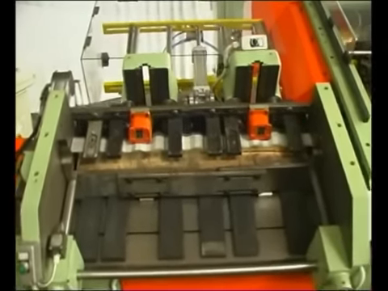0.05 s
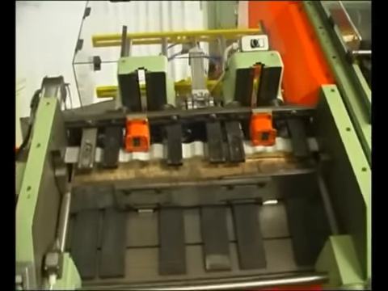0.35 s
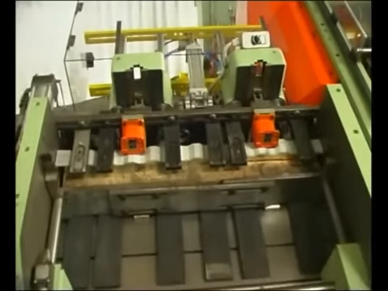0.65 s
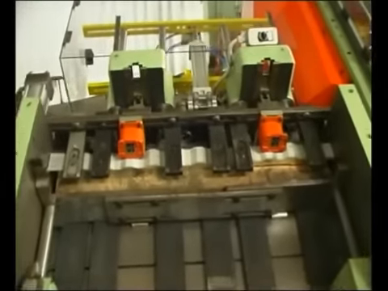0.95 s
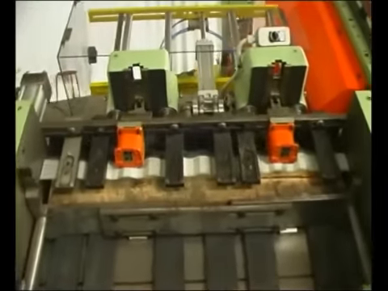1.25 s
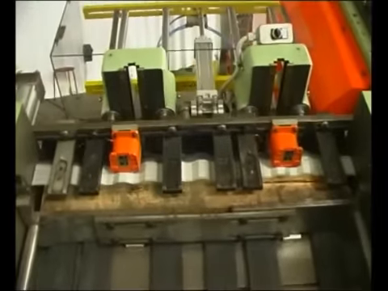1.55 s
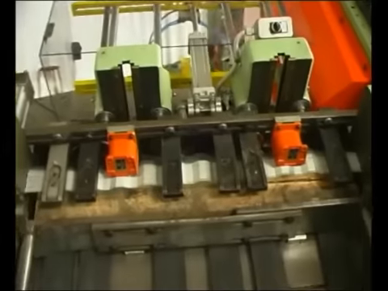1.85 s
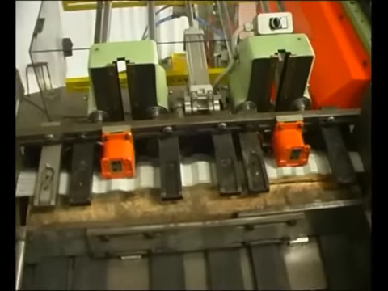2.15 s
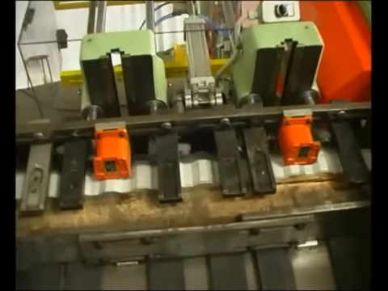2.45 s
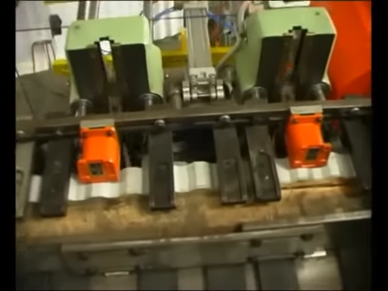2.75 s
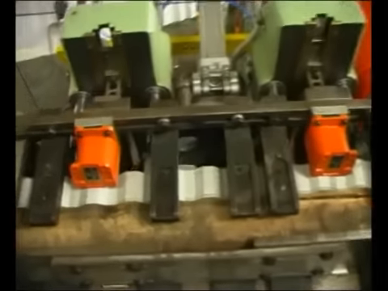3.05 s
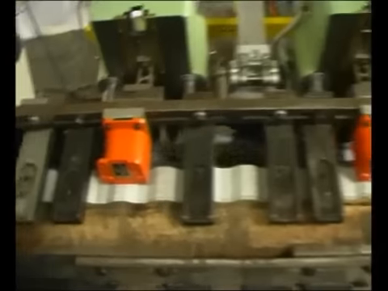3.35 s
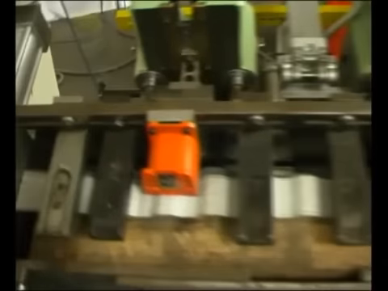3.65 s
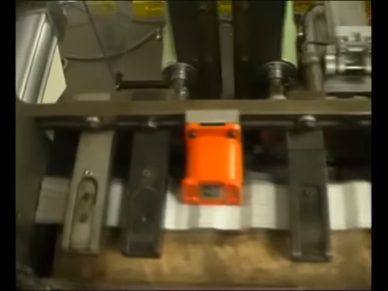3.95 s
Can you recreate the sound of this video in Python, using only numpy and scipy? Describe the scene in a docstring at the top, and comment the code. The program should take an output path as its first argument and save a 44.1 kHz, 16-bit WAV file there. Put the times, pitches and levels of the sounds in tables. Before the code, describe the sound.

A sheet-metal press pounds close by throughout, about five or six cracking, hollow knocks a second, over steady factory din with slight echo. High, whistling air hisses from the start until 1.4 seconds and again from 2.3 to 3.7. A sheet scrapes briefly near 1.1 and 3.4 seconds, each time followed by sharp metal clacks. Duller clacks and thuds come between 2.1 and 2.5 seconds.

```python
"""Sheet-metal press in a factory hall

Impacts excite the modes of a press about 5.6 times a second: each stroke cracks through the sheet
with a round knock and rings the bed. Twice, 13 strokes apart, turbulent air jets hiss to lift a new
sheet, which scrapes forward by friction and clacks against its stops. The metal is heard from
close by, with the hall's reverberation and a steady din of machinery behind it."""
import sys
import numpy as np
from scipy import signal
from scipy.fft import rfft, irfft
from scipy.io import wavfile
from scipy.ndimage import uniform_filter1d

SR = 44100
rng = np.random.default_rng(int(sys.argv[2]) if len(sys.argv) > 2 else 0)


def materialize(psi):
    """Save the field psi as 16-bit PCM at rate SR to the path in sys.argv[1].

    A 1-D psi becomes a single channel; in a 2-D psi each row is a channel.
    """
    bounded = np.clip(np.atleast_2d(psi).T, -1, 1)
    quanta = np.round(bounded * 32767).astype(np.int16)
    wavfile.write(sys.argv[1], SR, quanta)


N = 176400
FIRST_STROKE_S, STROKE_S = -.0602, .17758
ATTACK_S, TOP_HZ = .00055, 11600  # rise of a hard contact; upper edge of the sound

# Strength of the crack, stroke by stroke: level_db
STROKE_CRACK_DB = [5, -2, -1.5, -3.5, -3.5, -4.5, -3, -3, -2, 0, -1, -1, -2, -3, -1.5, -0.5, -4, -2, -1.5,
                   -1.5, -9, -6, -2]
# Strength of the knock and the bed's ring, stroke by stroke: level_db
STROKE_RING_DB = [-6, -6, -4, -3, -3, -3, -2, -2, -1, -.5, .3, 0, 0, -7, -7, 0, -.5, -.5, -.5, -1.5, -4.5,
                  -5.5, -8]
# Contacts that push on the bed within every stroke: delay_s, push_db
CONTACT_PUSHES = [(0, -10), (.0051, -7), (.0101, 0), (.0218, -9), (.0437, -13), (.063, -22), (.074, -22),
                  (.123, -24)]
# Noises of the same contacts: thump_db, crack_db, clatter_db
CONTACT_NOISES = [(0, 0, -6), (-37, -12, -6), (-17, -8, -4), (-14, -17, -5), (-3, -9, -2), (-6, -23, -4),
                  (-4, -25, -7), (-24, -22, -13)]
# Modes of the press bed: pitch_hz, level_db, t60_s
BED_MODES = [(149, -22, .15), (176, -24, .2), (290, -20, .12), (330, -22, .3), (410, -19, .15),
             (582, -20, .35), (680, -11, .08), (716, -15, .1), (805, -4, .06), (858, -13, .1),
             (1072, -20, .12)]
# Spectrum of the cracking sheet: frequency_hz, density_db
CRACK_SPECTRUM = [(300, 4), (1000, -5), (2000, 0), (3300, -5), (5000, 1), (7000, 1), (9000, -4.5),
                  (12000, -23)]
# Spectrum of dull metal clatter: frequency_hz, density_db
CLATTER_SPECTRUM = [(60, -28), (150, -4), (400, 2.5), (750, 6.5), (1100, 0), (1500, 0), (2500, -4.5),
                    (4000, -7.5), (9000, -59)]
BED_DB, BED_RISE_S = -14.3, .001
THUMP_DB, THUMP_HZ, THUMP_T60_S = -9, 328, .0088
CRACK_DB, CRACK_T60_S, CLATTER_DB, CLATTER_T60_S = -7.5, .054, -14.5, .069
def press():
    """Impact excitation: each contact rings the bed's damped modes, thumps, cracks and clatters."""
    t = np.arange(SR // 2) / SR
    ring = thump = crack_power = clatter_power = 0  # incoherent noises add in power
    for (delay, push_db), (thump_db, crack_db, clatter_db) in zip(CONTACT_PUSHES, CONTACT_NOISES):
        age = np.maximum(t - delay, 0)
        modes = sum(undb(db) * fade(age, t60, BED_RISE_S) * np.sin(2 * np.pi * hz * age)
                    for hz, db, t60 in BED_MODES)
        ring += undb(push_db) * modes
        thump += undb(thump_db) * fade(age, THUMP_T60_S, ATTACK_S) * np.sin(2 * np.pi * THUMP_HZ * age)
        crack_power += (undb(crack_db) * fade(age, CRACK_T60_S, ATTACK_S)) ** 2
        clatter_power += (undb(clatter_db) * fade(age, CLATTER_T60_S, ATTACK_S)) ** 2
    body = undb(BED_DB) * each_stroke(ring, undb(STROKE_RING_DB)) + undb(THUMP_DB) * each_stroke(thump)
    body = signal.sosfilt(signal.butter(4, 90, "high", fs=SR, output="sos"), body)
    crack = np.sqrt(each_stroke(crack_power, undb(STROKE_CRACK_DB) ** 2)) * noise(CRACK_SPECTRUM)
    clatter = np.sqrt(each_stroke(clatter_power)) * noise(CLATTER_SPECTRUM)
    return body + undb(CRACK_DB) * crack + undb(CLATTER_DB) * clatter


KNOCK_START_HZ, KNOCK_END_HZ, KNOCK_GLIDE_S = 460, 680, .014
KNOCK_DB, KNOCK_RISE_S, KNOCK_T60_S = -11.2, .0125, .05
HUM_HZ, HUM_DB, HUM_DELAY_S, HUM_HALF_WIDTH_S = 582, -28, .13, .053
def knocks():
    """Tension raises pitch: the punched sheet's knock glides up. The bed hums as the ram returns."""
    t = np.arange(int(STROKE_S * SR)) / SR
    hz = KNOCK_END_HZ + (KNOCK_START_HZ - KNOCK_END_HZ) * np.exp(-t / KNOCK_GLIDE_S)
    load = np.sqrt(np.minimum(t / KNOCK_RISE_S, 1))
    decay = undb(-60 * np.maximum(t - KNOCK_RISE_S, 0) / KNOCK_T60_S)
    knock = undb(KNOCK_DB) * load * decay * np.sin(2 * np.pi * np.cumsum(hz) / SR)
    hum = undb(HUM_DB) * swell(t - HUM_DELAY_S, HUM_HALF_WIDTH_S) * np.sin(2 * np.pi * HUM_HZ * t)
    return each_stroke(knock + hum, undb(STROKE_RING_DB))


def judder():
    """Damped resonance: the die set rattles on, rough and hollow, after each stroke."""
    t = np.arange(SR // 2) / SR
    shaking = each_stroke(fade(t, t60_s=.24, rise_s=.014))
    return undb(-19) * shaking * resonance(hz=715, width_hz=260)


# Impacts of the feeder's stops and grippers: start_s, bright_db, dull_db, t60_s
FEEDER_CLACKS = [(.009, -24, -12.5, 0.15), (1.33, -15, -18.5, 0.1), (1.431, -9.5, -14, 0.052),
                 (1.519, -16, -18, .05), (2.114, -19, -16, 0.026), (2.141, -14.5, -22, 0.028),
                 (2.291, -25, -17, 0.11), (2.317, -21, -15.5, 0.1), (2.426, -32, -11, 0.035),
                 (3.129, -12.5, -28, 0.041), (3.629, -15.5, -30, 0.12), (3.729, -8.5, -26, 0.052),
                 (3.793, -13.5, -40, 0.043), (3.83, -10.5, -37, 0.028), (3.965, -16, -37, 0.088)]
# Spectrum of the ringing stops: frequency_hz, density_db
STOP_SPECTRUM = [(400, -22), (1000, -12), (2400, 16), (3000, 11.5), (3700, 16.5), (4500, 11), (5600, 12),
                 (7200, 10.5), (9000, 7.5), (12000, -56)]
# Thuds of a sheet being lifted and dropped: start_s, pitch_hz, level_db
SHEET_THUDS = [(0.13, 380, -15), (2.269, 785, -16.5), (2.312, 690, -14.5), (2.439, 370, -13.5)]
def feeder(t):
    """Free decay after impact: stops and grippers clack, and each new sheet thuds."""
    bright = sum(undb(db) * fade(t - start, t60, ATTACK_S) for start, db, _, t60 in FEEDER_CLACKS)
    dull = sum(undb(db) * fade(t - start, t60, ATTACK_S) for start, _, db, t60 in FEEDER_CLACKS)
    thud = sum(undb(db) * fade(t - start, t60_s=.15, rise_s=.0077) * resonance(hz, width_hz=190)
               for start, hz, db in SHEET_THUDS)
    return bright * noise(STOP_SPECTRUM) + dull * noise(CLATTER_SPECTRUM) + thud


# Envelopes of the air jets, one curve for each sheet: time_s, level_db
JET_ENVELOPES = [
    [(.015, -46), (.046, -20), (.15, -24.5), (.244, -20.5), (.58, -20.5), (1.016, -20.5), (1.05, -22.5),
     (1.17, -22.5), (1.242, -24), (1.32, -18), (1.375, -22), (1.4, -30)],
    [(2.325, -47), (2.35, -18), (2.42, -22), (2.53, -19), (2.584, -20.5), (2.662, -20.5), (2.722, -18.5),
     (3.058, -19), (3.3, -18.5), (3.45, -21.5), (3.58, -20.5), (3.676, -18), (3.692, -35)],
]
# Spectrum of rushing air: frequency_hz, density_db
AIR_SPECTRUM = [(1500, -26), (3900, 1), (4500, 3), (5000, 6), (6300, 7), (7700, 3), (8800, 2.5), (10300, 4),
                (11500, -20)]
# Narrow whistles in the jets: pitch_hz, level_db
JET_WHISTLES = [(4463, -21), (4931, -14), (5378, -14), (7695, -19)]
JET_TREBLE_DB, JET_TREBLE_HZ = [-7.5, -4], 7400  # treble roll-off of each jet, and where it sets in
WAVER_DB, FLUTTER_DB = 3, .9
def jets(t):
    """Turbulence: air blown across the sheet edge gives a fluttering hiss with wavering whistles."""
    out = 0
    for curve, treble_db in zip(JET_ENVELOPES, JET_TREBLE_DB):
        time_s, level_db = np.array(curve, float).T
        envelope = undb(np.interp(t, time_s, level_db, left=-np.inf, right=-np.inf))
        air = colour(noise(AIR_SPECTRUM), [(JET_TREBLE_HZ, 0), (TOP_HZ, treble_db)])
        hiss = air + undb(-6) * resonance(hz=5540, width_hz=1550)
        whistles = sum(undb(db + WAVER_DB * np.tanh(walk(rate_hz=11))) * resonance(hz, width_hz=50)
                       for hz, db in JET_WHISTLES)
        out += envelope * (hiss + whistles)
    return out * undb(FLUTTER_DB * walk(rate_hz=45))


# Squeals of the jets: centre_s, half_width_s, pitch_hz, bandwidth_hz, level_db
EDGE_TONES = [(.17, .06, 5780, 160, -24), (.345, .06, 4940, 30, -26), (.35, .25, 5350, 200, -27),
              (.55, .22, 6400, 200, -24.5), (.8, .28, 6130, 350, -22), (.85, .35, 5560, 150, -24),
              (.97, .15, 6380, 160, -24), (1.14, .1, 5400, 200, -24), (2.41, .13, 5000, 240, -23),
              (2.6, .075, 4910, 110, -19), (2.6, .06, 5720, 200, -24), (2.745, .05, 6200, 130, -21),
              (2.9, .12, 6250, 220, -23), (3.05, .15, 6400, 180, -23.5), (3.265, .04, 5420, 80, -23),
              (3.37, .07, 5750, 200, -24), (3.63, .12, 6500, 350, -24)]
def squeals(t):
    """Edge tones: the jets catch the sheet edge and briefly sing out above the hiss."""
    return sum(undb(db) * swell(t - centre, half_width) * resonance(hz, bandwidth)
               for centre, half_width, hz, bandwidth, db in EDGE_TONES)


# Travel of each sheet over the table: start_s, end_s, level_db
SHEET_SLIDES = [(1.043, 1.202, -21), (3.345, 3.496, -20.5)]
# Resonances of the sliding sheet: pitch_hz, bandwidth_hz, level_db
SHEET_MODES = [(1400, 450, -4), (1780, 300, -10), (3070, 300, -13)]
# Spectrum of the scrape: frequency_hz, density_db
SCRAPE_SPECTRUM = [(400, -44), (900, 7.5), (1450, -2), (2300, 7), (3050, 6.5), (3700, 6.5), (5000, 4.5),
                   (7000, -9.5), (11000, -50)]
SCRAPE_RAMP_S, SCRAPE_ROUGH_DB = .021, 1.5
def slides(t):
    """Sliding friction: the sheet scrapes unevenly and rasps in its own resonances."""
    contact = sum(undb(db) * np.clip(np.minimum(t - start, end - t) / SCRAPE_RAMP_S, 0, 1)
                  for start, end, db in SHEET_SLIDES)
    rasp = sum(undb(db) * resonance(hz, bandwidth) for hz, bandwidth, db in SHEET_MODES)
    roughness = undb(SCRAPE_ROUGH_DB * walk(rate_hz=120))
    return contact * roughness * unit(noise(SCRAPE_SPECTRUM) + rasp)


PUFF_DB, PUFF_LEAD_S = -25.5, .003
def puffs():
    """Displacement flow: the falling ram squeezes out a puff of air just before each stroke."""
    t = np.arange(int(STROKE_S * SR)) / SR
    squeeze = swell(t - STROKE_S + PUFF_LEAD_S, half_width_s=.038)
    return undb(PUFF_DB) * each_stroke(squeeze) * noise(AIR_SPECTRUM)


# Resonances of the press frame: pitch_hz, level_db
FRAME_MODES = [(106, -42.5), (149, -43.5), (176, -44), (327, -41), (357, -50), (582, -46), (1076, -42)]
def frame():
    """Forced vibration: the running drive keeps the frame's narrow resonances singing."""
    return sum(undb(db) * resonance(hz, width_hz=6.3) for hz, db in FRAME_MODES)


# Spectrum of the running machinery: frequency_hz, density_db
MACHINERY_SPECTRUM = [(25, -46), (45, -26), (62, -42), (80, -44), (103, -8), (125, -6.5), (200, -5.5),
                      (330, 3), (480, -1), (620, 0), (1000, -9), (1450, -6), (2200, -10.5), (4000, -12),
                      (7000, -17), (9600, -19), (11000, -77)]
DIN_DB, DRIVE_DB, RATTLE_DB, RATTLES_PER_S = -23, -33, -37, 150
def machinery():
    """Superposition: steady din, drive noise periodic with the crank, and loose parts rattling."""
    crank_turns = np.resize(rng.standard_normal(int(STROKE_S * SR)), N)
    clicks = (rng.random(N) < RATTLES_PER_S / SR).astype(float)
    click_decay = fade(np.arange(SR // 20) / SR, t60_s=.045, rise_s=ATTACK_S)
    rattle = unit(signal.fftconvolve(clicks, click_decay)[:N] * noise(CLATTER_SPECTRUM))
    din = noise(MACHINERY_SPECTRUM)
    drive = colour(crank_turns, MACHINERY_SPECTRUM)
    return undb(DIN_DB) * din + undb(DRIVE_DB) * drive + undb(RATTLE_DB) * rattle


# Spectrum of the hall's reflections: frequency_hz, density_db
HALL_SPECTRUM = [(100, -5), (700, -3), (1500, 0), (5000, -3), (11000, -12)]
HALL_DB, HALL_T60_S, HALL_DELAY_S = -11, .35, .014
def hall(x):
    """Diffuse reverberation: the factory's reflections merge into a dull, decaying tail."""
    decay = fade(np.arange(N) / SR - HALL_DELAY_S, HALL_T60_S, HALL_DELAY_S / 2)
    tail = (noise(HALL_SPECTRUM) * decay)[:SR]
    return undb(HALL_DB) * signal.fftconvolve(x, tail / np.sqrt(np.sum(tail ** 2)))[:N]


def undb(db):
    """Amplitude ratio of a level in decibels."""
    return 10 ** (np.asarray(db) / 20)


def unit(x):
    """Normalisation to rms 1."""
    return x / np.sqrt(np.mean(x ** 2) + 1e-18)


def colour(x, spectrum):
    """Spectral shaping of x by (frequency_hz, gain_db) points, at rms 1."""
    hz, db = np.array(spectrum, float).T
    f = np.maximum(np.fft.rfftfreq(len(x), 1 / SR), 1)
    gain = undb(np.interp(np.log(f), np.log(hz), db))
    return unit(irfft(rfft(x) * gain, len(x)))


def noise(spectrum):
    """Gaussian noise with the given spectrum."""
    return colour(rng.standard_normal(N), spectrum)


def resonance(hz, width_hz):
    """Noise in a Lorentzian band, width_hz wide at half amplitude."""
    f = np.fft.rfftfreq(N, 1 / SR)
    return unit(irfft(rfft(rng.standard_normal(N)) / (1 + (2 * (f - hz) / width_hz) ** 2), N))


def walk(rate_hz):
    """Smooth random modulation at rms 1."""
    hold = int(SR / rate_hz)
    steps = np.repeat(rng.standard_normal(N // hold + 1), hold)
    return unit(uniform_filter1d(steps, hold)[:N])


def fade(t, t60_s, rise_s):
    """Quick rise and exponential decay, silent before t = 0."""
    t = np.maximum(t, 0)
    return (1 - np.exp(-t / rise_s)) * np.exp(-np.log(1000) * t / t60_s)


def swell(t, half_width_s):
    """Gaussian envelope centred on t = 0."""
    return np.exp(-2 * (t / half_width_s) ** 2)


def each_stroke(shape, gains=(1,) * len(STROKE_CRACK_DB)):
    """Periodic repetition: one shape laid at every stroke of the press."""
    out = np.zeros(N + 3 * SR)
    for k, gain in enumerate(gains):
        start = int((1 + FIRST_STROKE_S + k * STROKE_S) * SR)  # 1 s of room for a stroke before t = 0
        out[start:start + len(shape)] += gain * shape
    return out[SR:SR + N]


def scene():
    """Direct and reverberant metal sounds add to air and machinery, the same in both ears."""
    t = np.arange(N) / SR
    metal = press() + knocks() + judder() + feeder(t) + slides(t)
    mono = metal + hall(metal) + jets(t) + squeals(t) + puffs() + frame() + machinery()
    return np.array([mono, mono])


LOW_CUT_HZ, CEILING = 103.6, .95
def record(dry):
    """Band limiting and saturation: the microphone drops deep bass; the recorder cuts peaks and top."""
    thin = signal.sosfilt(signal.butter(3, LOW_CUT_HZ, "high", fs=SR, output="sos"), dry)
    rounded = thin / (1 + (thin / CEILING) ** 4) ** .25
    return signal.sosfilt(signal.ellip(8, .2, 80, TOP_HZ, fs=SR, output="sos"), rounded)


dry = scene()
out = record(dry)
materialize(out)
```